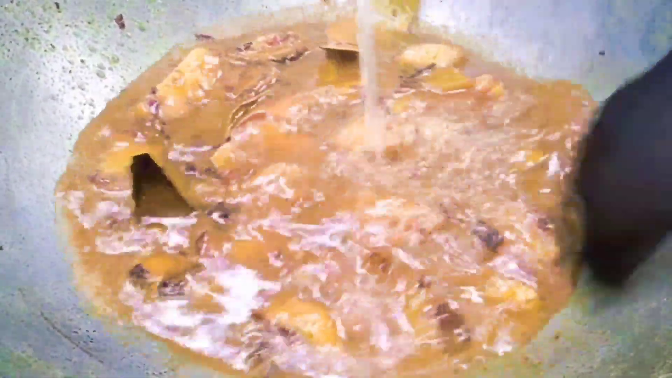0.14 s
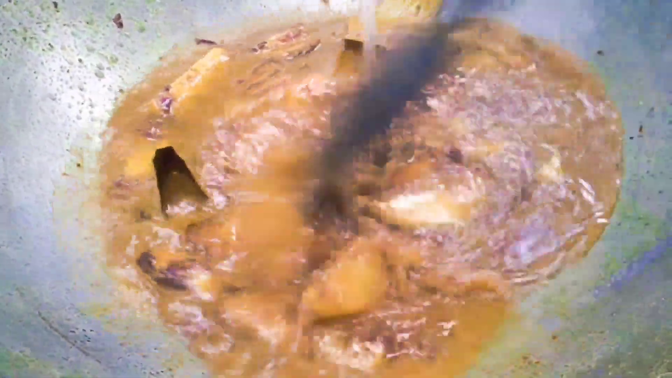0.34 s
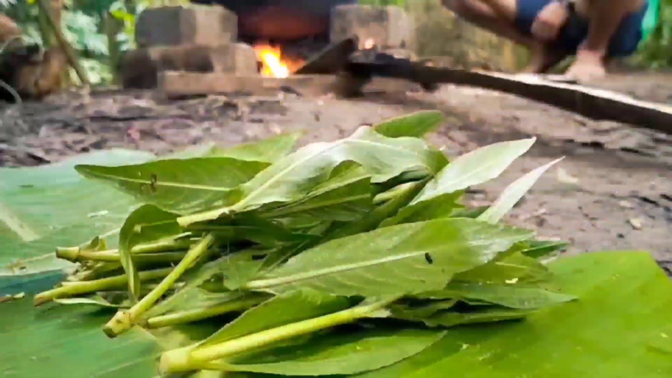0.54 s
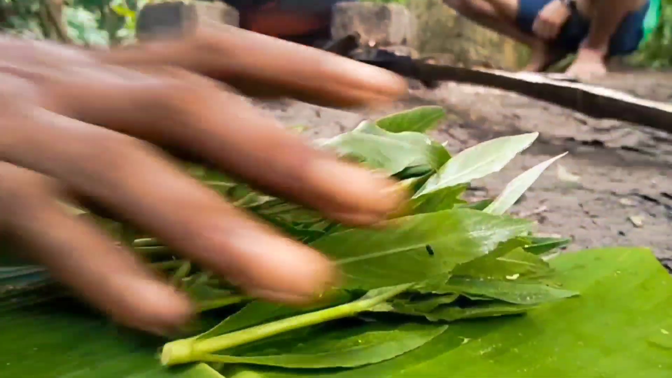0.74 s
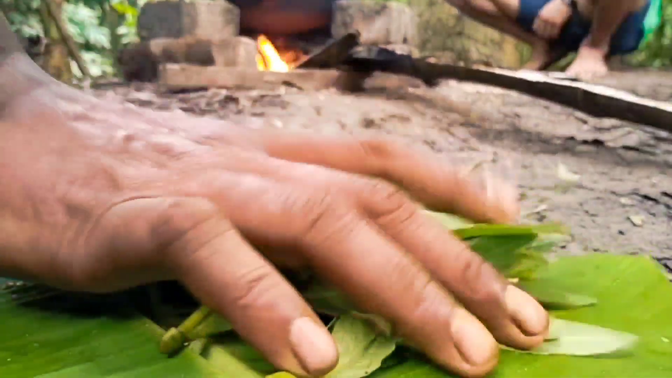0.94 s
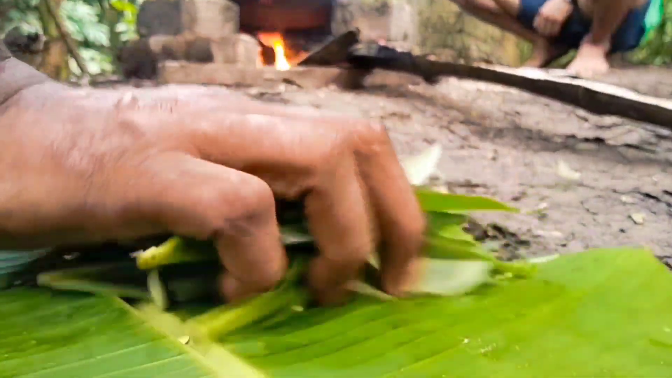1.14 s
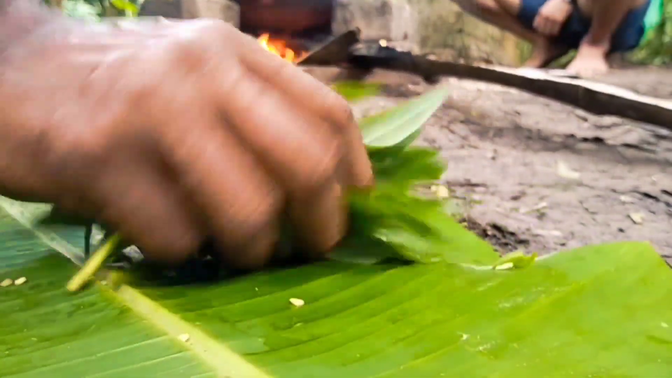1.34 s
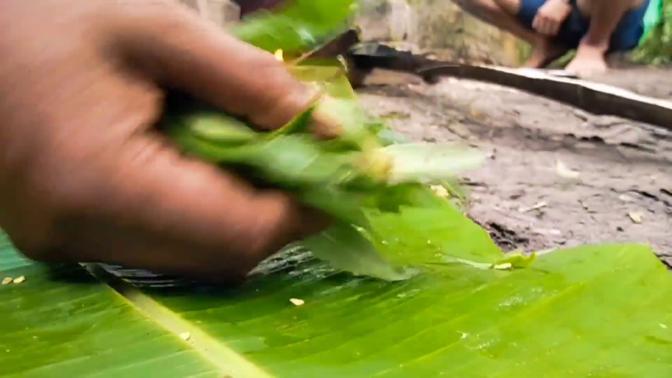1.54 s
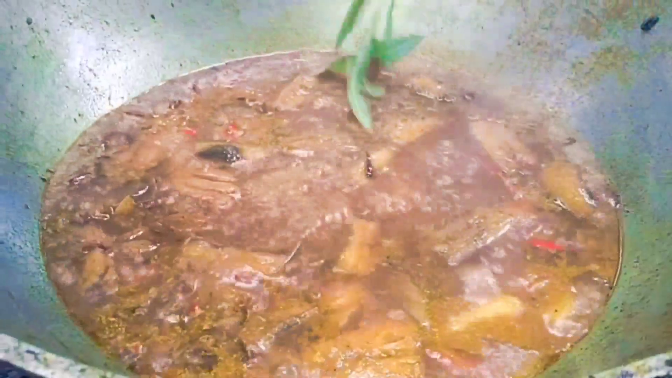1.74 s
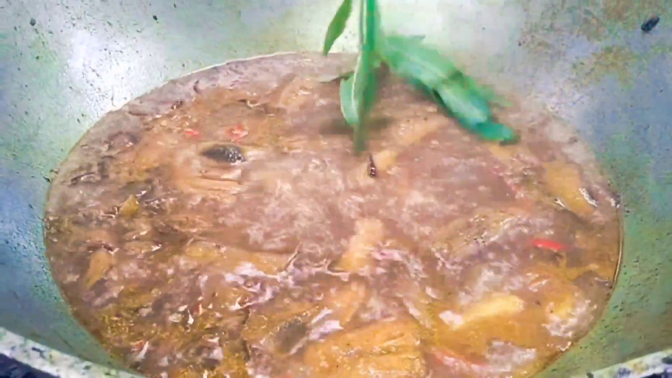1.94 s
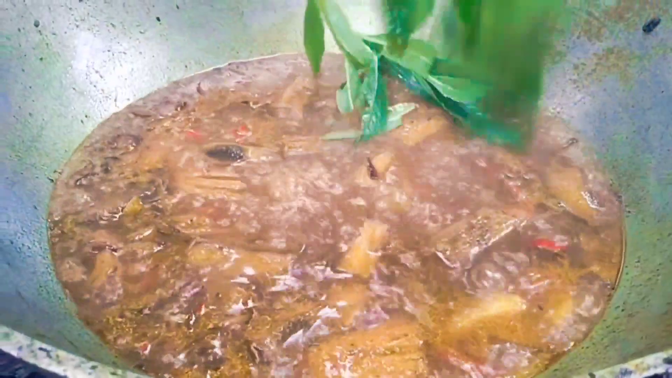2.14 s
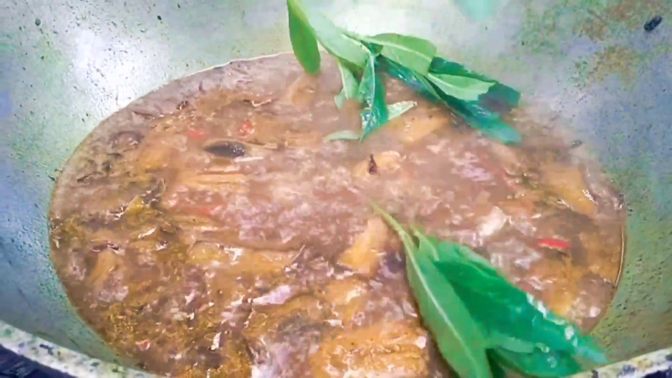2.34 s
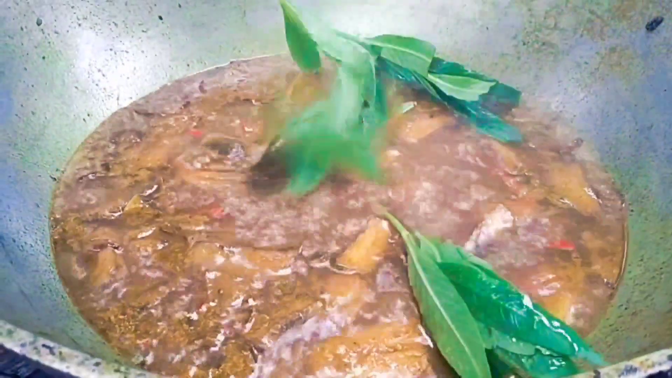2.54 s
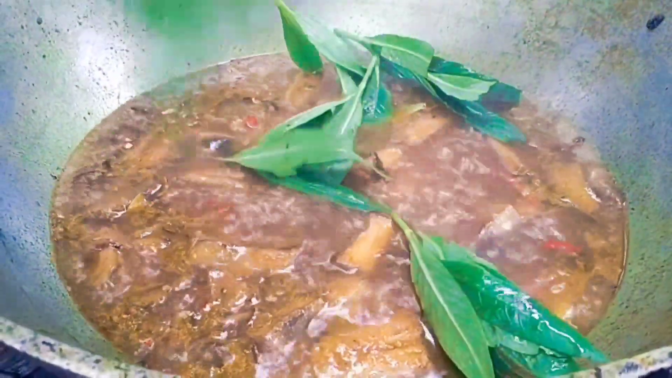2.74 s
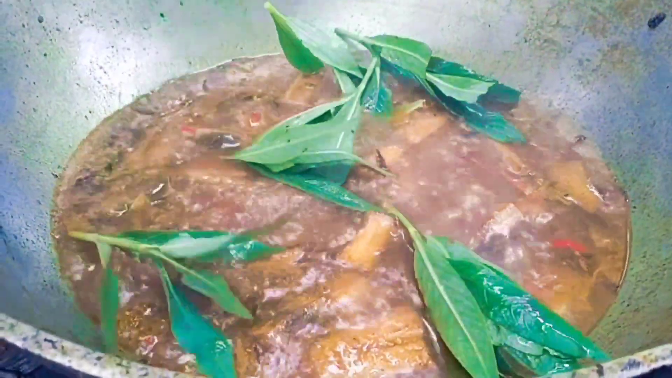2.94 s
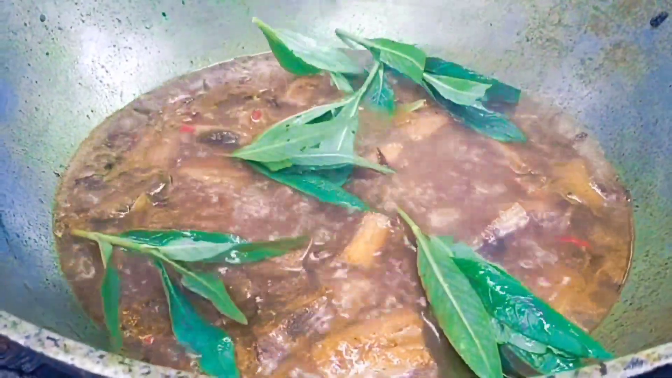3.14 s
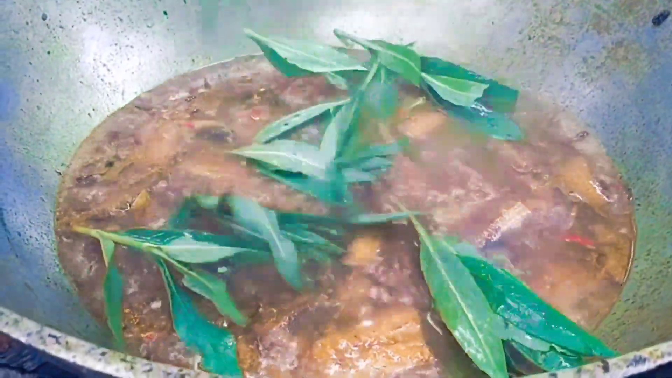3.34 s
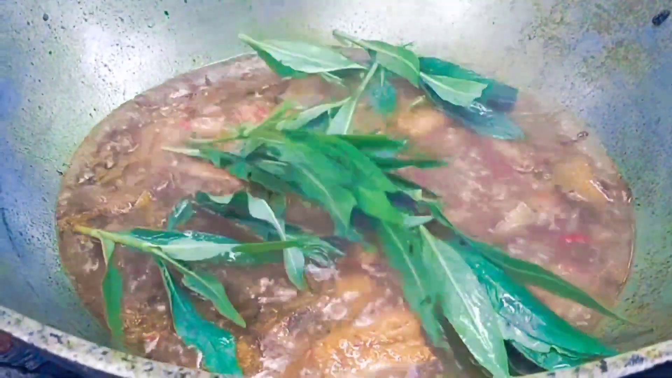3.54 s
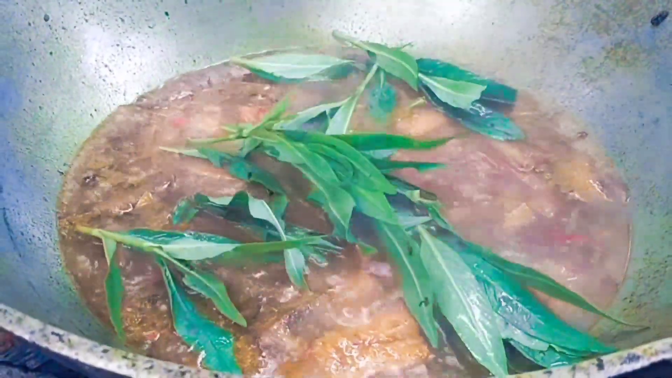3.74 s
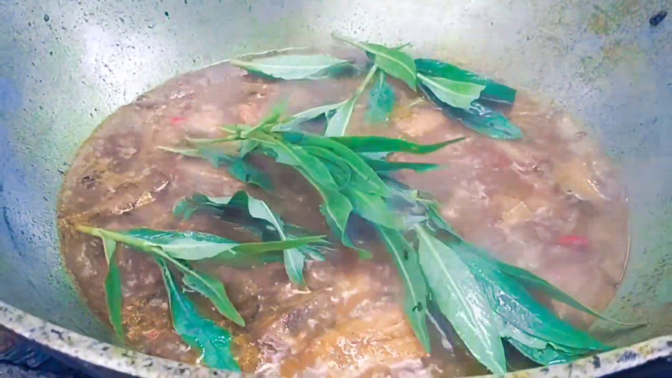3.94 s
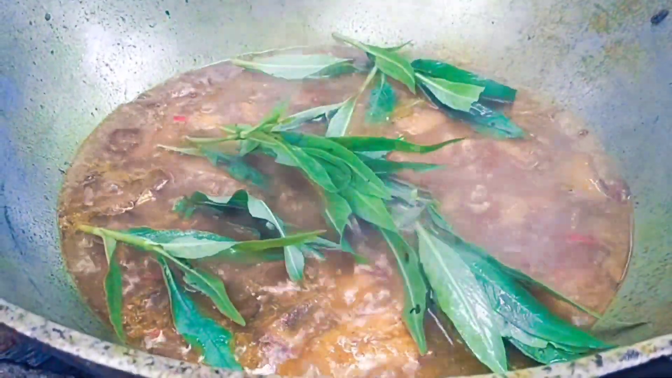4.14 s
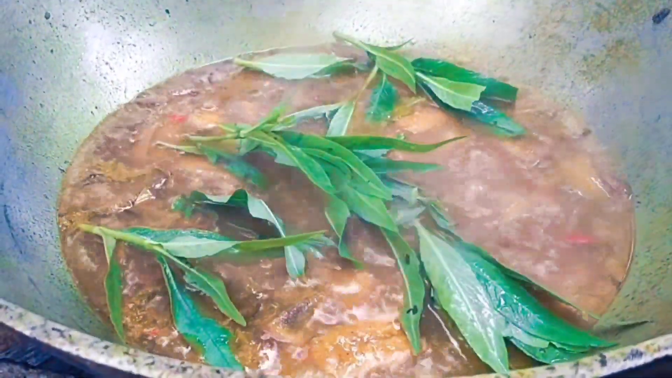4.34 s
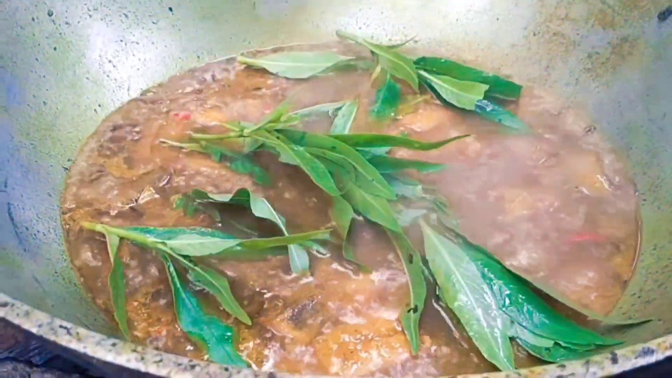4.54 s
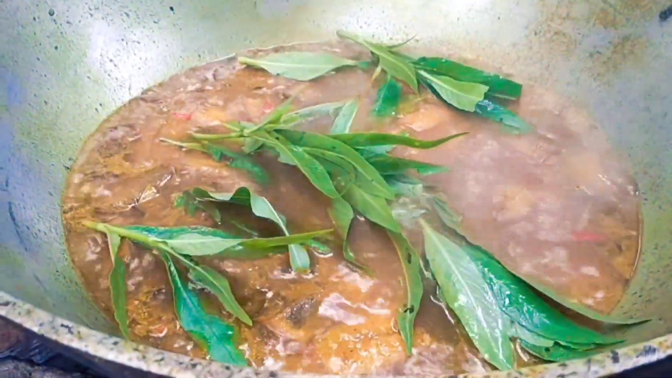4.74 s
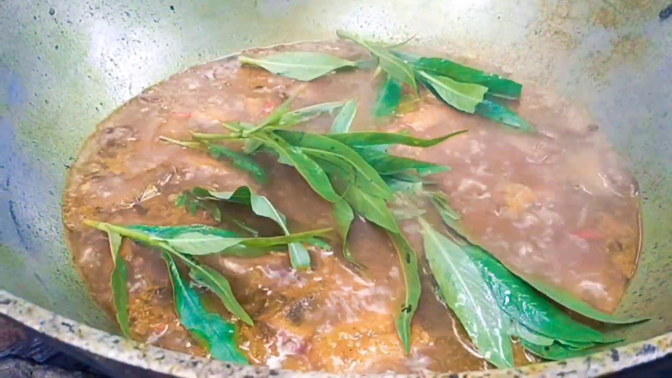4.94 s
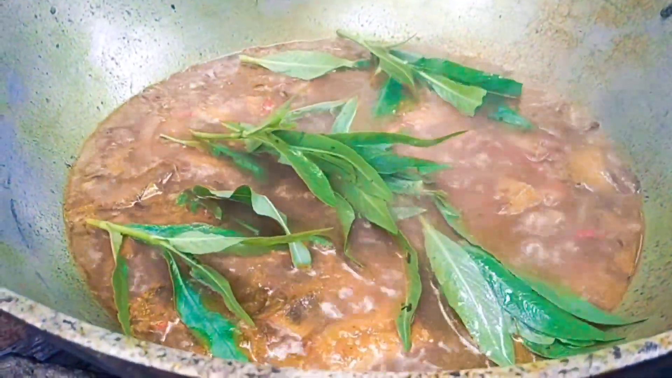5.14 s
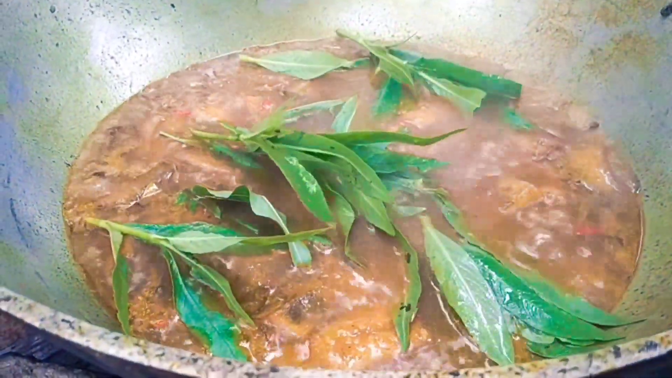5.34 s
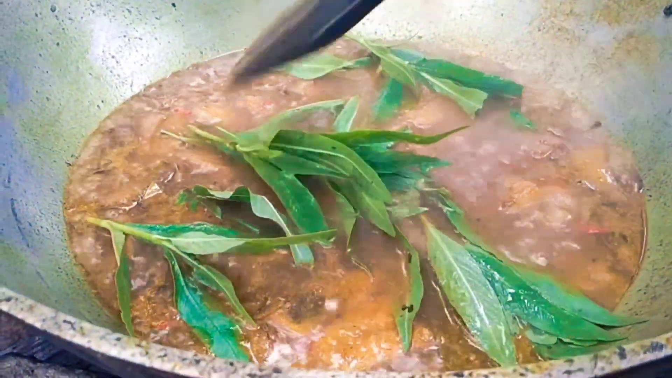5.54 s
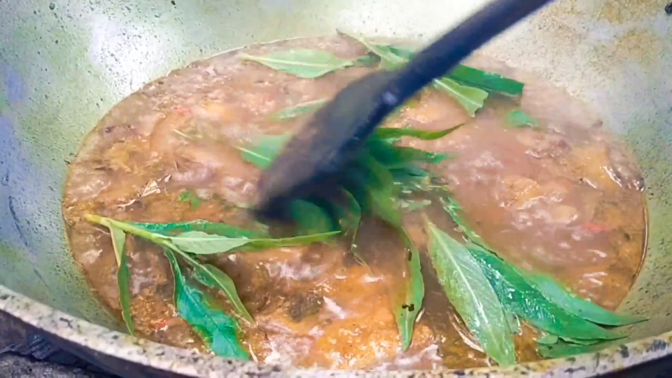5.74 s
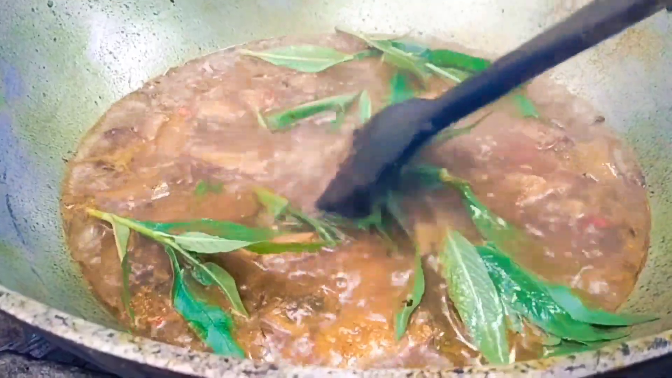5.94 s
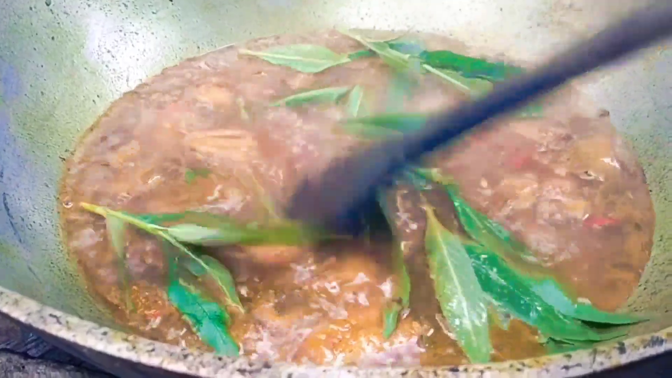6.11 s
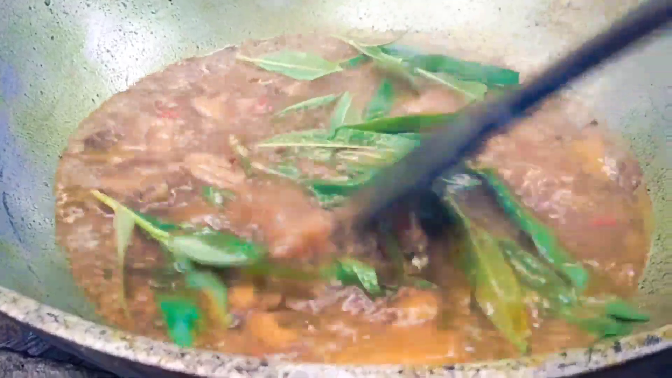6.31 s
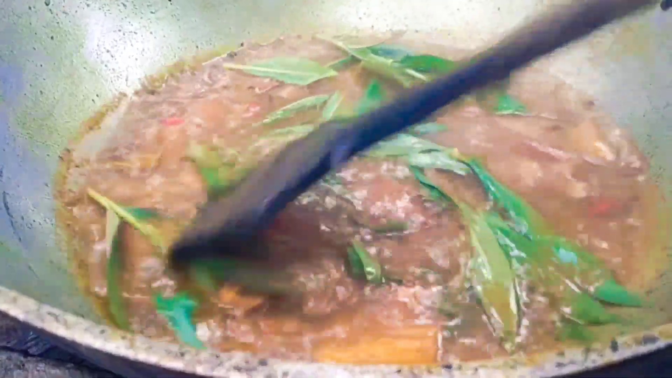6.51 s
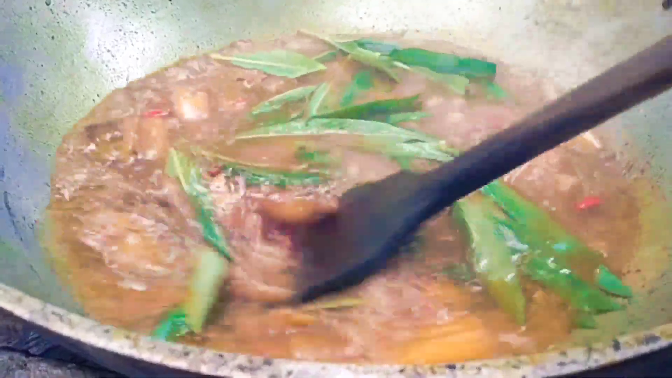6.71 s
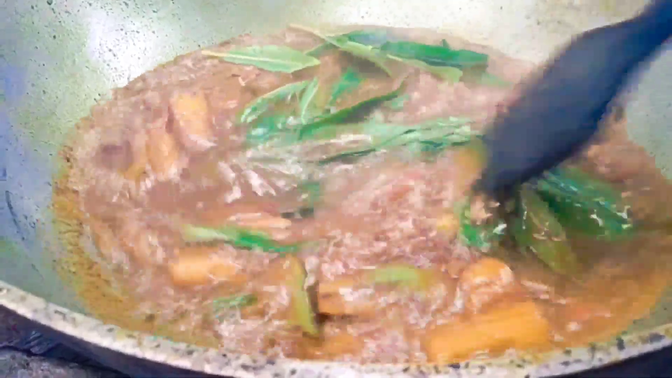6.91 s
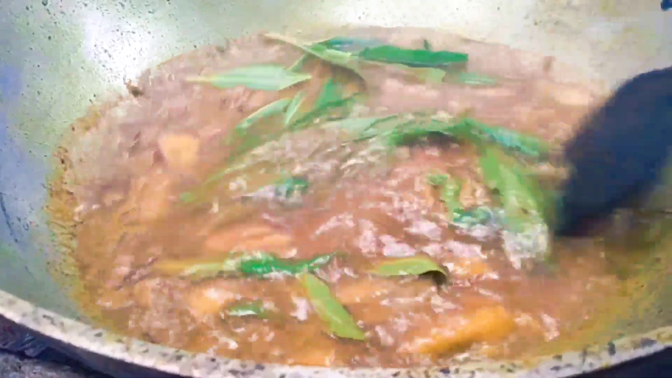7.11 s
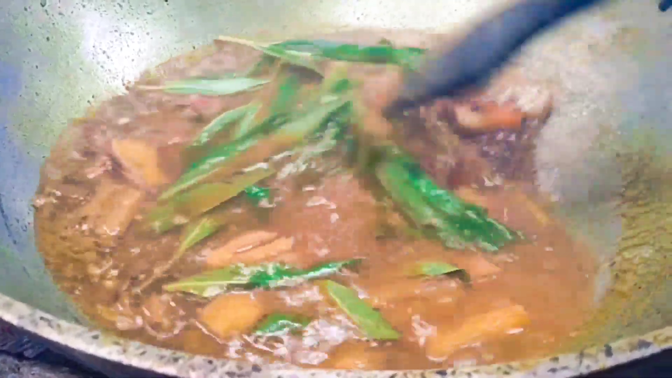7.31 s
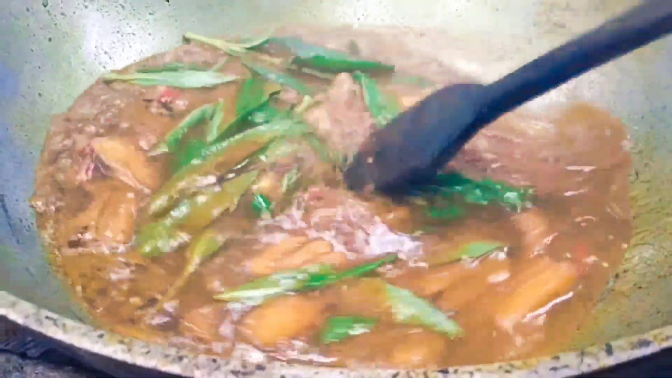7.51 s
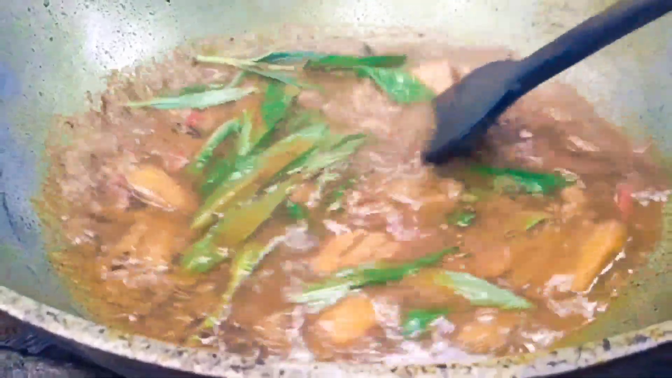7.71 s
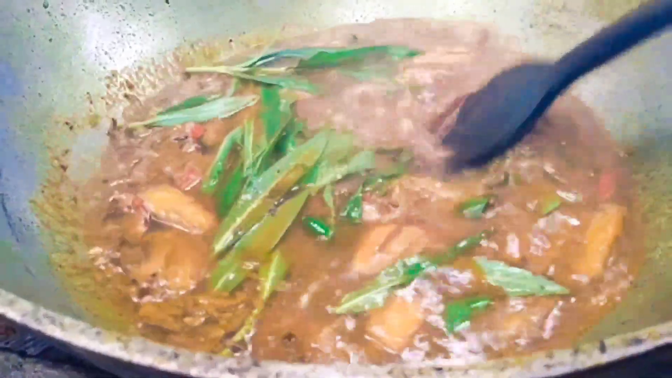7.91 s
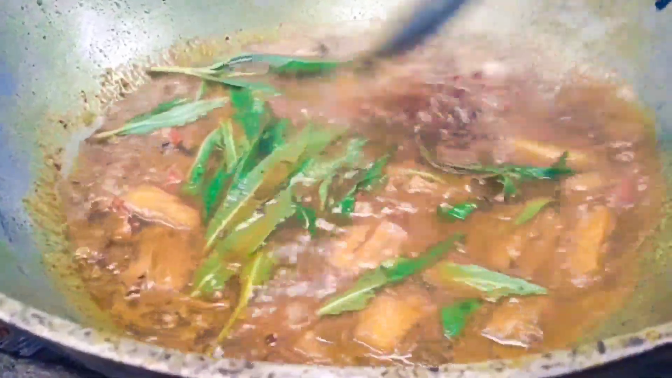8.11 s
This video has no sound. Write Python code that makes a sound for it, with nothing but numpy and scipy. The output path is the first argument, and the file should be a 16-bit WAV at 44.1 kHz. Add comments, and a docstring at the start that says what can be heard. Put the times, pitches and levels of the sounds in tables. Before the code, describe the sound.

Close up outdoors, bright hissing steam surges and spits as water meets hot metal, then suddenly dies. Fresh leaves brush and crinkle briefly, leaving birds and insects clearer. Then a pan of thick sauce simmers gently, with tiny ticks, round bubble pops and short sizzles up its wall. Stirring brings denser, louder plops. Low flames flutter beneath, and birdcalls linger among trees in wide stereo.

```python
"""Water hits hot metal in a wok on an outdoor fire: crackling steam flares, pings, churning bubbles and sharp
spits. Leaves, a coloured crackle, rustle loudest around 1.1 s as the hiss dies away. From 1.7 s the curry
simmers: crackle for the fizz, ringing bubbles that pop and, from 5.7 s, more of them under a scraping ladle;
noise flutters as the fire, and spits recur. Throughout, gliding sines whistle as birds among echoing trees,
over filtered noise for air and insects."""
import sys
import numpy as np
from scipy import signal
from scipy.fft import rfft, irfft, next_fast_len
from scipy.io import wavfile
from scipy.ndimage import uniform_filter1d

SR = 44100
rng = np.random.default_rng(int(sys.argv[2]) if len(sys.argv) > 2 else 0)


def generate_wav(sig):
    """Save sig (samples, or channels by samples) to the path in sys.argv[1] as 16-bit PCM at SR."""
    pcm = np.round(np.clip(np.atleast_2d(sig).T, -1, 1) * 32767).astype(np.int16)
    wavfile.write(sys.argv[1], SR, pcm)


N = 360297
TIME = np.arange(N) / SR


def undb(db):
    """Decibels to gain."""
    return 10 ** (np.asarray(db) / 20)


def unit(x):
    """Scale to an rms of one."""
    return x / np.sqrt(np.mean(x ** 2))


def gain_curve(rows):
    """Gain over time from (s, dB) rows; the end levels hold outside them."""
    return undb(np.interp(TIME, *np.transpose(rows)))


def swells(rows, steady_db):
    """Gain of a steady sound plus, in power, bell-shaped swells from (middle s, length s, dB) rows."""
    power = undb(steady_db) ** 2
    for middle_s, length_s, db in rows:
        bell = np.exp(-(2 * (TIME - middle_s) / length_s) ** 2)
        power = power + (undb(db) * bell) ** 2
    return np.sqrt(power)


def walk(rate_hz):
    """Smooth random wander with a spread near one."""
    hold = int(SR / rate_hz)
    steps = np.repeat(rng.standard_normal(N // hold + 1), hold)
    return uniform_filter1d(steps, hold)[:N]


def colour(x, points):
    """Minimum-phase filter through (Hz, dB) points: causal, so clicks keep their sharp front."""
    size = next_fast_len(N // 2 + 2048, True) * 2
    hz, db = np.transpose(points)
    bins_hz = np.maximum(np.arange(size // 2 + 1) * SR / size, 1)
    gain = undb(np.interp(np.log(bins_hz), np.log(hz), db))
    cepstrum = irfft(np.log(gain))
    cepstrum[1:size // 2] *= 2  # fold onto positive time
    response = np.exp(rfft(cepstrum[:size // 2], size))
    return irfft(rfft(x, size) * response)[..., :N]


# Stereo width. Each row: frequency in Hz, side relative to mid in dB, before the source's own offset.
WIDTH_HZ_DB = [(100, -23), (700, -4), (2400, -4), (4400, -8), (7500, -4.5), (8800, -49)]


def stereo(pair, side_db=0):
    """Left and right from two unrelated signals taken as mid and side, at unit rms."""
    mid = pair[0]
    side = undb(side_db) * colour(pair[1], WIDTH_HZ_DB)
    return unit(np.array([mid + side, mid - side]))


def noise():
    """Two unrelated white noises."""
    return rng.standard_normal((2, N))


def crackle(rate_hz, spread_db):
    """Two streams of one-sample bursts at random times: many weak, a few strong."""
    sizes = undb(spread_db * np.minimum(rng.exponential(size=(2, N)), 6))
    struck = rng.random((2, N)) < rate_hz / SR
    return unit(struck * np.sign(noise()) * sizes)


def add(track, start_s, sound):
    """Mix a sound into a track at a start time."""
    start = int(np.clip(start_s * SR, 0, N - 1))
    track[start:start + len(sound)] += sound[:N - start]


def echoes(x, t60_s, spread=1):
    """Dense scattered reflections as decaying noise; a larger spread differs more between the ears."""
    t = np.arange(SR) / SR
    mid, side = rng.standard_normal((2, SR)) * np.exp(-np.log(1000) * t / t60_s)
    tail = np.array([mid + spread * side, mid - spread * side])
    return signal.fftconvolve(x[None], unit(tail) / np.sqrt(SR), axes=1)[:, :N]


def bubble(hz, t60_s, rise=0.05, snap=0.3, snap_s=0.0029):
    """The film snaps and the open cavity rings briefly, rising in pitch; small bubbles snap higher."""
    t = np.arange(SR // 15) / SR
    pitch_hz = hz * (1 + rise * np.minimum(t / t60_s, 1))
    ring = np.sin(2 * np.pi * np.cumsum(pitch_hz) / SR) * np.exp(-np.log(1000) * t / t60_s)
    band = signal.butter(2, [hz / 2, min(1.6 * hz, .45 * SR)], "band", fs=SR)
    film = unit(signal.lfilter(*band, rng.standard_normal(len(t))))
    return ring + snap * film * np.exp(-t / snap_s)


# Resonances of the wok's bowl. Each row: frequency in Hz, relative gain in dB.
BOWL_HZ_DB = [(280, -5), (480, 0), (700, -5), (890, 2), (1100, -3), (1400, 1), (2500, -4)]


def bubbles(start_s, end_s, count, centre_hz, spread_db, octaves=0.67, t60_s=0.024):
    """Bubbles of random size break the surface at random times and ring in the bowl."""
    track = np.zeros(N)
    places = rng.random(count)
    draws = np.clip(rng.standard_normal((count, 2)), -2, 2)
    for place, (pitch, size) in zip(places, draws):
        pop = bubble(centre_hz * 2 ** (octaves * pitch), t60_s)
        add(track, start_s + place * (end_s - start_s), undb(spread_db * size) * pop)
    track = colour(track, BOWL_HZ_DB)
    return track + undb(-2.5) * echoes(track, t60_s=0.089, spread=0.15)


# Water reaching fresh hot metal. Each row: peak in seconds, rise in seconds, hiss level in dB.
HISS_FLARES = [(.01, 0.032, -21), (.19, 0.018, -19), (.545, 0.15, -18.5)]
COOLING_DB_PER_S = 25
EASE_S, EASE_FALL_S, EASE_DB = 0.674, 0.012, -3.5  # the stream thins
DYING_DB_PER_S = 47  # from EASE_S, on top of the cooling


def frying():
    """Gain of the hiss: it flares, sags as the metal cools, and dies when the stream thins."""
    flares = []
    for peak_s, rise_s, db in HISS_FLARES:
        attack = np.clip(1 + (TIME - peak_s) / rise_s, 0, 1)
        flares.append(attack * undb(db - COOLING_DB_PER_S * np.maximum(TIME - peak_s, 0)))
    since_s = np.maximum(TIME - EASE_S, 0)
    ease_db = EASE_DB * np.minimum(since_s / EASE_FALL_S, 1)
    return np.max(flares, axis=0) * undb(ease_db - DYING_DB_PER_S * since_s)


# Steam hiss spectrum. Each row: frequency in Hz, relative gain in dB.
STEAM_HZ_DB = [(300, -26), (700, -20), (900, -8.5), (1150, -15), (1600, -9), (2150, -5.5), (2800, -10.5),
               (3700, 2), (5600, -0.5), (6900, 0), (8900, -22.5), (10200, -8), (11300, -4), (13700, -16)]
# Low rumble spectrum of slosh and fire. Each row: frequency in Hz, relative gain in dB.
RUMBLE_HZ_DB = [(20, -10.5), (80, 1.5), (115, 1.5), (170, -10.5), (600, -34.5)]
POUR_END_S = .787


def pour():
    """Water flashes to steam, tiny steam bubbles ping, and the stream churns air into the sauce."""
    steam = stereo(colour(crackle(rate_hz=16000, spread_db=2.3), STEAM_HZ_DB), side_db=-24)
    steam = steam * undb(.9 * walk(110))
    pings = bubbles(0, POUR_END_S, count=110, centre_hz=4970, spread_db=7.0, octaves=0.237).mean(axis=0)
    churn = bubbles(0, POUR_END_S, count=130, centre_hz=866, spread_db=1.0).mean(axis=0)
    slosh = stereo(colour(noise(), RUMBLE_HZ_DB), side_db=19.0) * undb(-53.0 + 4.5 * walk(12.0))
    running = np.clip((POUR_END_S - TIME) / 0.022, 0, 1)
    hiss = (steam + undb(-4.0) * pings) * frying()
    return running * (hiss + undb(-37.5) * churn + slosh)


# Fizz spectrum. Each row: frequency in Hz, relative gain in dB.
FIZZ_HZ_DB = [(150, -5), (400, -7.5), (700, -0.5), (880, 5.5), (1120, -8.5), (2500, -3.5), (4700, 4.5),
              (6000, 1), (7400, -12), (8800, -13), (12500, -7), (15500, -3.5)]
# Sizzle spectrum at the hot wall. Each row: frequency in Hz, relative gain in dB.
WALL_HZ_DB = [(1200, -10.5), (3700, -2), (5000, 0), (8500, -18), (15000, -33)]
# Brief frothing of the fizz. Each row: middle in seconds, length in seconds, level in dB.
FIZZ_SWELLS = [(4.67, 0.2, -44), (5.64, 0.075, -40)]
# Sauce washing up the hot wall. Each row: middle in seconds, length in seconds, level in dB.
WALL_SWELLS = [(2.15, 0.94, -44.5), (3.0, 0.28, -38.5), (7.26, 0.62, -40)]
FIZZ_DB, WALL_DB = -42.5, -48.5  # steady levels
SIMMER_START_S, SIMMER_FADE_S = 1.68, 0.25
STIR_START_S = 5.7  # from here the ladle frees more bubbles


def simmer():
    """Tiny bubbles fizz and tick, larger ones blip, more so when stirred; sauce sizzles up the hot wall."""
    end_s = N / SR
    fizz = stereo(colour(crackle(rate_hz=6000, spread_db=3.4), FIZZ_HZ_DB), side_db=-4)
    fizz = fizz * undb(1.9 * walk(70)) * swells(FIZZ_SWELLS, FIZZ_DB)
    wall = stereo(colour(crackle(rate_hz=2500, spread_db=2.0), WALL_HZ_DB), side_db=-2.5)
    wall = wall * swells(WALL_SWELLS, WALL_DB)
    ticks = bubbles(SIMMER_START_S, end_s, count=200, centre_hz=4680, spread_db=5.5, octaves=0.34, t60_s=0.0068)
    blips = bubbles(SIMMER_START_S, end_s, count=230, centre_hz=1170, spread_db=4.5, octaves=0.76)
    stirred = bubbles(STIR_START_S, end_s, count=40, centre_hz=1260, spread_db=2, octaves=0.577)
    return fizz + wall + undb(-33.5) * ticks + undb(-42.5) * blips + undb(-37.5) * stirred


# Biggest bubbles bursting. Each row: start in seconds, relative level in dB, starting pitch in Hz.
BIG_BUBBLES = [(.22, -31.5, 450), (.282, -32, 415), (.618, -28.5, 520), (2.252, -35, 1320),
               (2.36, -30, 860), (2.557, -31, 1280), (2.766, -38, 1700), (3.33, -31.5, 1590),
               (4.056, -30.5, 910), (4.069, -32, 1400), (4.12, -32.5, 1610), (4.239, -35, 930),
               (4.361, -34, 895), (4.59, -30.5, 920), (4.613, -38, 1430), (5.23, -33, 880),
               (5.914, -38, 760), (6.021, -33, 890), (6.273, -23.5, 1540), (6.405, -27, 910),
               (6.571, -32, 905), (6.71, -35, 915), (6.809, -30, 1260), (6.832, -34, 870),
               (7.141, -36, 1310), (7.399, -36, 870), (7.435, -32.5, 815), (7.539, -32.5, 860),
               (7.704, -32, 563), (7.719, -28.5, 616), (7.961, -37, 930), (8.148, -24.5, 1380)]


def plops(t60_s=0.024, level_db=2):
    """Big bubbles burst through the liquid and echo in the bowl."""
    track = np.zeros(N)
    for start_s, db, hz in BIG_BUBBLES:
        add(track, start_s, undb(db + level_db) * bubble(hz, t60_s))
    return track + undb(-13.0) * echoes(track, t60_s=0.23, spread=0.29)


# Wet splats of water and sauce during the pour, then the ladle scraping at 5.73 s and 6.03 s. Each row: start
# in seconds, decay in seconds, centre in Hz, level in dB.
SPLATS_AND_SCRAPES = [(.042, 0.0097, 2070, -20), (.588, 0.0068, 1600, -25), (.664, 0.0078, 1430, -23.5),
                      (5.733, 0.019, 2400, -34), (6.03, 0.013, 2760, -33.5)]


def splats(width=0.7, attack_s=0.0034):
    """Liquid slaps down and breaks into a short spray of droplets, or the ladle scrapes: band noise, fast
    attack and decay."""
    track, t = np.zeros(N), np.arange(SR // 12) / SR
    for start_s, decay_s, hz, db in SPLATS_AND_SCRAPES:
        band = signal.butter(2, [hz / (1 + width), hz * (1 + width)], "band", fs=SR)
        spray = unit(signal.lfilter(*band, rng.standard_normal(len(t))))
        envelope = np.minimum(t / attack_s, 1) * np.exp(-np.maximum(t - attack_s, 0) / decay_s)
        add(track, start_s, undb(db) * spray * envelope)
    return track


# Sharpest spits. Each row: start in seconds, peak in dB before the spectrum below, lower partial in Hz.
SHARP_SPITS = [(0.0832, 0, 3870), (.186, -12, 3990), (.254, -9, 6500), (.392, -9, 4220), (0.5546, 0, 5100),
               (.579, -6, 3500), (2.513, -19, 4000), (4.314, -23, 4400), (5.3606, -9.5, 7480),
               (5.374, -18, 7800), (5.6049, -16.5, 3900), (5.716, -23, 5130), (6.759, -24, 3500),
               (7.229, -21.5, 4850), (7.745, -21, 5100)]
# Spit spectrum. Each row: frequency in Hz, gain in dB.
SPIT_HZ_DB = [(7600, 0), (8700, -13), (10800, -2)]


def spits(decay_s=0.0014, overtone=1.684, splash=0.5):
    """Single droplets explode with a sharp tick: two short partials and a splash."""
    track, t = np.zeros(N), np.arange(SR // 50) / SR
    for start_s, db, hz in SHARP_SPITS:
        ring = np.sin(2 * np.pi * hz * t) + np.sin(2 * np.pi * overtone * hz * t)
        tick = (ring + splash * rng.standard_normal(len(t))) * np.exp(-t / decay_s)
        add(track, start_s, undb(db) * tick / np.abs(tick).max())
    return colour(track, SPIT_HZ_DB)


# Draught of the fire. Each row: time in seconds, level in dB before the flutter.
FIRE_S_DB = [(1.9, -46.5), (3.2, -46), (4.8, -45.5), (5.25, -49), (5.9, -44.5), (6.7, -53.5), (7.15, -45),
             (7.6, -53.5), (8.1, -47)]


def fire():
    """Flames flutter under the wok: low noise with a slow wander in level."""
    return stereo(colour(noise(), RUMBLE_HZ_DB)) * gain_curve(FIRE_S_DB) * undb(0.49 * walk(2.9))


# Hand in the leaves. Each row: time in seconds, level in dB.
LEAVES_S_DB = [(.95, -47.5), (1.08, -39.5), (1.3, -45), (1.55, -51.5)]
# Leaf spectrum. Each row: frequency in Hz, relative gain in dB.
LEAF_HZ_DB = [(600, -23), (2500, 7.5), (4500, -1), (9000, -9), (12200, -5), (15500, -9.5)]


def leaves():
    """Soft leaves brush and crinkle under a hand."""
    return stereo(colour(crackle(rate_hz=7300, spread_db=2.0), LEAF_HZ_DB)) * gain_curve(LEAVES_S_DB)


# All bird levels are relative.
# Level whistles. Each row: start in seconds, length in seconds, pitch in Hz, level in dB.
LEVEL_WHISTLES = [(1.135, 0.22, 1553, -43.5), (1.51, .045, 2520, -46), (2.06, 0.093, 2480, -48),
                  (2.26, 0.08, 3570, -41), (2.865, 0.22, 1540, -42), (3.15, 0.18, 811, -51),
                  (4.94, 0.066, 2950, -47.5), (6.8, 0.068, 2780, -48), (6.914, 0.14, 3760, -43.5),
                  (7.985, .045, 2700, -45)]
# Calls in two rising steps, the second shorter, higher and buzzy. Each row: start in seconds, level in dB.
TWO_STEP_CALLS = [(2.225, -39), (3.275, -40), (4.46, -40), (6.83, -50)]
# Low upward slurs. Each row: start in seconds, length in seconds, level in dB.
UP_SLURS = [(1.975, 0.075, -39.5), (3.945, 0.085, -33.5), (7.19, .07, -43)]
# Falling whistles. Each row: start in seconds, length in seconds, level in dB.
FALLING_WHISTLES = [(0.926, 0.074, -42), (2.345, .12, -42.5), (2.45, .15, -40), (5.6, .12, -48),
                    (6.49, .15, -41), (7.61, 0.14, -41)]
# Quick upward chirps. Each row: start in seconds, level in dB.
QUICK_CHIRPS = [(.888, -44), (4.889, -40), (5.055, -40.5), (5.2, -41.5), (5.355, -40.5), (5.505, -43),
                (7.815, -44), (7.968, -42)]
# Whistles that drop onto a pitch and hold it. Each row: start in seconds, length in seconds, level in dB.
DROP_WHISTLES = [(1.415, .08, -37), (3.475, .08, -43)]
# Glides. Each is one row: first pitch in Hz, last pitch in Hz, bend (1 is straight, more levels off sooner),
# waver as a share of the pitch, direct path in dB.
FIRST_STEP_GLIDE = (2780, 3270, 1.1, 0.008, 0)
SECOND_STEP_GLIDE = (3380, 3720, 1.1, .07, -3)
SLUR_GLIDE = (1420, 2500, 1.35, 0.048, -4)
CHIRP_GLIDE = (1950, 2850, 1.15, 0.02, -2)
DROP_GLIDE = (2450, 2010, 3, 0.014, 0)
FALL_START_HZ, FALL_HZ_PER_S = 3500, 7400  # longer falls end lower
FALL_BEND, FALL_WAVER, FALL_DIRECT_DB = 1.35, 0.024, -1.5
WHISTLE_WAVER, WHISTLE_DIRECT_DB = 0.02, 0
CHIRP_S, FIRST_STEP_S = 0.04, .1
SECOND_STEP_S, SECOND_STEP_AFTER_S, SECOND_STEP_DB = 0.0578, 0.083, 3.5


def song():
    """Every bird note as (start s, length s, dB, glide), from the shape of each kind of call."""
    notes = []
    for start_s, length_s, hz, db in LEVEL_WHISTLES:
        notes.append((start_s, length_s, db, (hz, hz, 1, WHISTLE_WAVER, WHISTLE_DIRECT_DB)))
    notes += [(start_s, CHIRP_S, db, CHIRP_GLIDE) for start_s, db in QUICK_CHIRPS]
    notes += [(start_s, length_s, db, SLUR_GLIDE) for start_s, length_s, db in UP_SLURS]
    notes += [(start_s, length_s, db, DROP_GLIDE) for start_s, length_s, db in DROP_WHISTLES]
    for start_s, length_s, db in FALLING_WHISTLES:
        end_hz = FALL_START_HZ - FALL_HZ_PER_S * length_s
        notes.append((start_s, length_s, db, (FALL_START_HZ, end_hz, FALL_BEND, FALL_WAVER, FALL_DIRECT_DB)))
    for start_s, db in TWO_STEP_CALLS:
        second_s = start_s + SECOND_STEP_AFTER_S
        notes.append((start_s, FIRST_STEP_S, db, FIRST_STEP_GLIDE))
        notes.append((second_s, SECOND_STEP_S, db + SECOND_STEP_DB, SECOND_STEP_GLIDE))
    return notes


BIRD_LAG_S = .00009  # birds sit to the right: the left channel lags
TREES_DELAY_S = .025  # extra path by way of the trees


def birds(flutter_db=4.0, trees_db=-5, level_db=-0.55):
    """Gliding sines, smeared by nearby trunks, linger among the trees; foliage weakens the direct path."""
    sung, direct = np.zeros(N), np.zeros(N)
    wobble, flutter = walk(260), undb(flutter_db * walk(60))
    for start_s, length_s, db, (first_hz, last_hz, bend, waver, direct_db) in song():
        u, start = np.linspace(0, 1, int(length_s * SR)), int(start_s * SR)
        glide_hz = last_hz + (first_hz - last_hz) * (1 - u) ** bend
        hz = glide_hz * (1 + waver * np.resize(wobble[start:], len(u)))
        swell = u ** .75 * np.sqrt(1 - u) * np.resize(flutter[start:], len(u))
        note = undb(db + level_db) * unit(swell * np.sin(2 * np.pi * np.cumsum(hz) / SR))
        add(sung, start_s + TREES_DELAY_S, note)
        add(direct, start_s, note * undb(direct_db))
    late = np.interp(TIME - BIRD_LAG_S, TIME, direct)
    trunks = undb(-3.5) * echoes(sung, t60_s=0.48, spread=.7)
    trees = undb(trees_db) * echoes(sung, t60_s=1.6)
    return np.array([late, direct]) + trunks + trees


# Woodland murmur spectrum. Each row: frequency in Hz, relative gain in dB.
AIR_HZ_DB = [(20, 0.5), (150, -1), (210, -5), (400, -6), (1150, -12), (1700, -12), (2400, -8.5),
             (3300, -15.5), (4900, -24), (15500, -31)]
# Insect band spectrum. Each row: frequency in Hz, relative gain in dB.
INSECT_HZ_DB = [(5300, -14.5), (5800, -4.5), (6150, 1.5), (7100, 5.5), (7550, 0.5), (7950, -12.5),
                (8500, -45)]


def outdoors(air_db=-46, insects_db=-44.5):
    """Distant woodland murmur and a steady chorus of insects, both filtered noise."""
    air = stereo(colour(noise(), AIR_HZ_DB)) * undb(air_db + .8 * walk(5))
    insects = stereo(colour(noise(), INSECT_HZ_DB)) * undb(insects_db + walk(30))
    return air + insects


def scene():
    """The pour, the leaves, then the simmering wok, all in the open air."""
    simmering = np.clip((TIME - SIMMER_START_S) / SIMMER_FADE_S, 0, 1)
    wok = pour() + simmering * (simmer() + fire()) + plops() + splats() + spits()
    return wok + leaves() + birds() + outdoors()


TOP_HZ = 15550


def record(dry):
    """The recorder cuts the top steeply: an elliptic low-pass."""
    low_pass = signal.ellip(10, .2, 80, TOP_HZ, fs=SR, output="sos")  # ripple and stopband in dB
    return signal.sosfilt(low_pass, dry)


dry = scene()
out = record(dry)
generate_wav(out)
```